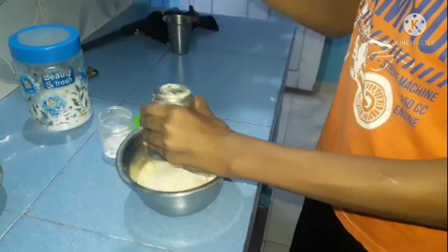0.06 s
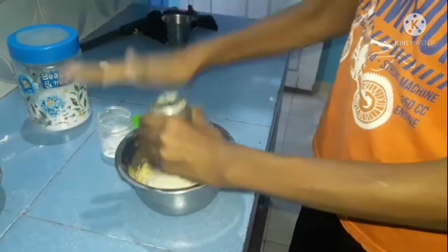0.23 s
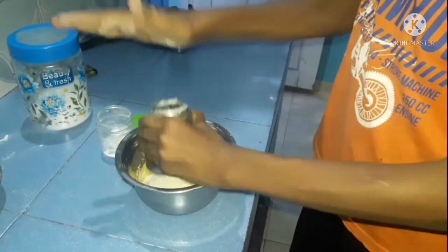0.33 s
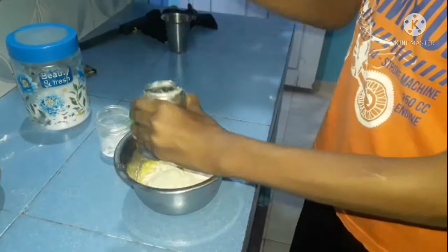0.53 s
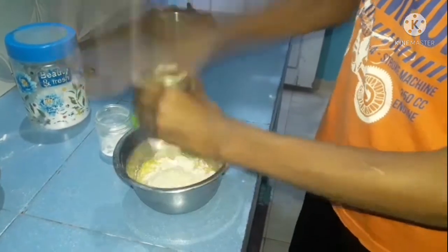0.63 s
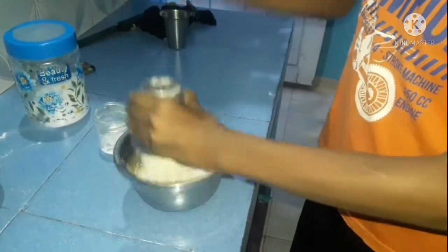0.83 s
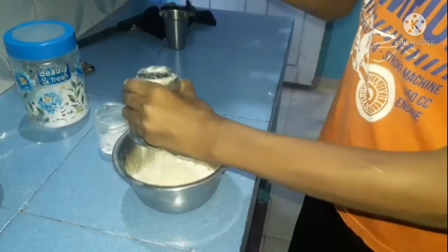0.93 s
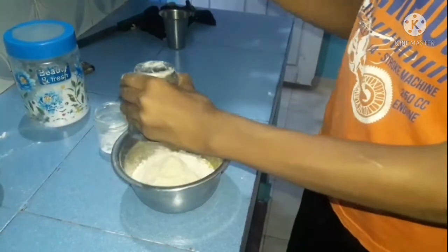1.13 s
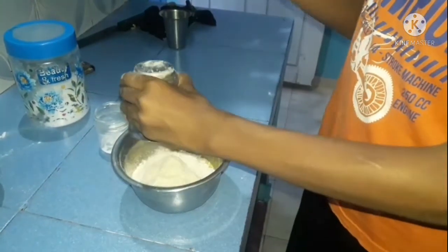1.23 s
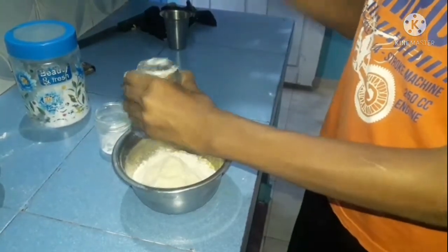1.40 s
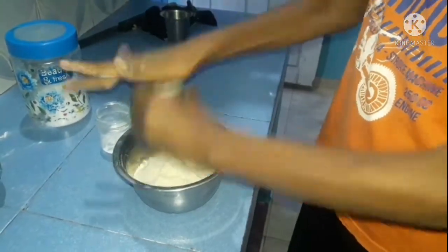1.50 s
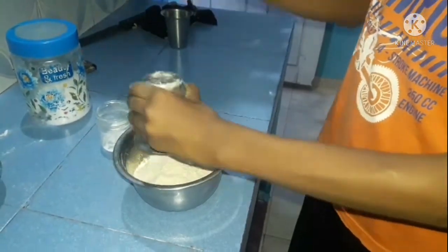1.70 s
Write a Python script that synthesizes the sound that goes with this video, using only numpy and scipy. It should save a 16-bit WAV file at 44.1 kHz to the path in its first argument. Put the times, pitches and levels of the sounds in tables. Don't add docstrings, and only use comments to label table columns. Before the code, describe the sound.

A hand slaps a steel tumbler over a metal bowl with a loud hollow crack, then a softer thud, bright clinks and a final knock, in an echoing tiled kitchen, heard by a phone a little way off.

```python
import sys
import numpy as np
from scipy import signal
from scipy.fft import rfft, irfft
from scipy.io import wavfile
from scipy.ndimage import uniform_filter1d

SR = 44100
rng = np.random.default_rng(int(sys.argv[2]) if len(sys.argv) > 2 else 0)


def level_to_linear(level):
    exponent = np.asarray(level, float) / 20
    return 10 ** exponent


def store_wav(level_fs):
    pcm = np.round(np.clip(np.atleast_2d(level_fs), -1, 1) * 32767)
    wavfile.write(sys.argv[1], SR, pcm.T.astype(np.int16))


N = 77175

# freq_hz, gain_db
RIM_CRACK = [(1000, -34.5), (2100, -0.5), (3200, -12.5), (4500, 1), (6000, -8.5), (9000, -12.5)]
# freq_hz, level_db, t60_s
RIM_MODES = [(1845, -9, 0.12), (2840, 3, 0.037), (3530, -12, .03), (4800, -2.5, .015), (5450, -13, 0.02)]


def set_rms(x, rms_db):
    return x * level_to_linear(rms_db) / np.sqrt(np.mean(x ** 2))


def read_table(table, freq_hz):
    table_hz, value = np.array(table).T
    return np.interp(np.log(np.maximum(freq_hz, 1)), np.log(table_hz), value)


def colour(x, spectrum, size=4096):
    half = size // 2
    gain_db = read_table(spectrum, np.arange(half + 1) * SR / size)
    cepstrum = irfft(gain_db * np.log(10) / 20)
    cepstrum[1:half] *= 2
    cepstrum[half + 1:] = 0
    impulse = irfft(np.exp(rfft(cepstrum)))
    return signal.fftconvolve(x, impulse)[:N], np.sqrt(np.sum(impulse ** 2))


def ring(x, modes):
    t = np.arange(SR // 2) / SR
    impulse = np.zeros(len(t))
    for freq_hz, level_db, t60_s in modes:
        decay = np.exp(-np.log(1000) * t / t60_s)
        impulse += level_to_linear(level_db) * np.sin(2 * np.pi * freq_hz * t) * decay
    return signal.fftconvolve(x, impulse)[:N]


def walk(rate_hz):
    hold = int(SR / rate_hz)
    steps = np.repeat(rng.standard_normal(N // hold + 1), hold)
    return uniform_filter1d(steps, hold)[:N]


def blows(events, crack_spectrum, modes):
    click_share, crack_db, ring_db = 0.25, 19.5, -13.5
    room_ring_db = -2.5
    size = 1024
    t = np.arange(size) / SR
    gritty, smooth = np.zeros(N + size), np.zeros(N + size)
    for start_s, level_db, contact_s in events:
        start = int(start_s * SR)
        burst = rng.standard_normal(size) * np.exp(-t / contact_s)
        burst /= np.sqrt(np.sum(burst ** 2))
        burst[0] += click_share
        gritty[start:start + size] += level_to_linear(level_db) * burst
        smooth[start] += level_to_linear(level_db)
    cracks = []
    for drive in (gritty, smooth):
        crack, norm = colour(drive[:N], crack_spectrum)
        cracks.append(level_to_linear(crack_db) * crack / norm)
    rings = level_to_linear(ring_db) * ring(smooth[:N], modes)
    return np.array(cracks) + rings * np.array([[1], [level_to_linear(room_ring_db)]])


def air():
    # freq_hz, gain_db
    hiss_spectrum = [(40, -25.5), (120, -11.5), (190, -25.5), (1200, -44.5), (3200, -34.5), (4000, -23.5),
                     (6200, -41.5), (14000, -34)]
    hiss_db, hum_hz, hum_db = -65, 116.5, -68
    hiss = set_rms(colour(rng.standard_normal(N), hiss_spectrum)[0], hiss_db) * level_to_linear(1.1 * walk(24))
    pitch_hz = hum_hz * (1 + 0.029 * walk(3.3))
    hum = np.sin(2 * np.pi * np.cumsum(pitch_hz) / SR)
    return hiss + hum * level_to_linear(hum_db + 5.2 * walk(12))


def slide():
    # time_s, scrape_db, singing_db
    motion = [(0, -50, -46.5), (0.052, -48.5, -55.5), (0.101, -45.5, -55.5), (.14, -49.5, -57),
              (0.172, -51, -74), (0.202, -57.5, -59), (.3, -80, -72.5), (.62, -84, -82), (.84, -52, -55),
              (.95, -46.5, -78), (1.05, -60.5, -76), (1.079, -63.5, -59.5), (1.13, -75.5, -57),
              (1.21, -74, -63.5), (1.3, -76.5, -67.5), (1.329, -79.5, -75.5), (1.48, -72.5, -75),
              (1.75, -102, -80)]
    # freq_hz, gain_db
    scrape_spectrum = [(40, -57.5), (109, -5), (160, -19), (700, -20.5), (1280, -28.5), (2780, -24),
                       (4500, -35.5), (6000, -43)]
    # freq_hz, level_db, t60_s
    bowl_modes = [(2742, 19, .14), (2680, 8, 0.14), (2720, -5.5, 0.025), (2082, -10.5, .05),
                  (2520, -31, 0.014)]
    t = np.arange(N) / SR
    time_s, scrape_db, singing_db = np.array(motion).T
    grit = rng.standard_normal(N) * level_to_linear(2.7 * walk(130))
    scrape = set_rms(colour(grit, scrape_spectrum)[0], 0)
    singing = ring(rng.standard_normal(N), bowl_modes)
    singing /= np.sqrt(uniform_filter1d(singing ** 2, size=3000))
    return scrape * level_to_linear(np.interp(t, time_s, scrape_db)) + singing * level_to_linear(np.interp(t, time_s, singing_db))


def rim_ticks():
    # start_s, level_db, contact_s
    events = [(.0075, -41.5, .0006), (.015, -62, 0.0045), (.023, -45, 0.0021), (.0455, -48.5, 0.0045),
              (.0745, -48, .0015), (1.037, -51.5, 0.0023), (1.1344, -54, 0.0016), (1.2517, -60, .001),
              (1.4866, -64, .001)]
    return blows(events, RIM_CRACK, RIM_MODES)


def foot_bumps():
    # start_s, level_db, contact_s
    events = [(.003, -65, .002), (.838, -33, 0.0046), (0.99, -49.5, 0.0034), (.930, -37.5, .002),
              (1.1, -58.5, 0.0018), (1.297, -67, 0.0044)]
    # freq_hz, gain_db
    crack_spectrum = [(60, -20), (130, 0), (300, -7.5), (500, -7.5), (900, -48.5)]
    # freq_hz, level_db, t60_s
    modes = [(163, -11, 0.11), (306, -3.5, 0.064)]
    return blows(events, crack_spectrum, modes)


def bounces():
    # start_s, level_db, contact_s
    events = [
        (.0455, -56, .001),
        (.8570, -45, .001),
        (.8732, -48, .001),
        (.8880, -50, .001),
    ]
    # freq_hz, level_db, t60_s
    modes = [(2760, 24, .016)]
    return blows(events, RIM_CRACK, modes)


def knocks():
    # start_s, level_db, contact_s
    events = [
        (1.5072, -48, 0.00069),
        (1.5086, -43, 0.0016),
        (1.5107, -27.5, 0.0029),
    ]
    # freq_hz, gain_db
    crack_spectrum = [(200, -38), (700, -9), (1000, -3.5), (1400, -21), (2900, -6.5), (3700, -5),
                      (5400, -9), (12000, -9)]
    # freq_hz, level_db, t60_s
    modes = [(824, -14, .15), (924, -10, .08), (1113, -8, .08), (1976, -14, .05), (2330, -14, .05),
             (3391, -8, .06), (3585, -14, .06), (4800, -12, .03), (5346, -6, .08), (2870, 21, .010)]
    return blows(events, crack_spectrum, modes)


def clinks():
    # start_s, level_db, contact_s
    events = [
        (.8352, -47.5, .001),
        (.8378, -24, .0005),
        (.9152, -34.5, .0004),
        (.9225, -47, 0.0015),
    ]
    # freq_hz, gain_db
    crack_spectrum = [(120, -38.5), (320, 2), (690, -14), (1570, -6.5), (2400, -18.5), (2860, -5),
                      (4800, -3), (6000, -5)]
    return blows(events, crack_spectrum, RIM_MODES)


def thuds():
    # start_s, level_db, contact_s
    events = [
        (.6777, -34.5, 0.0027),
        (.6797, -16.5, 0.00132),
    ]
    # freq_hz, gain_db
    crack_spectrum = [(40, -36.5), (110, -14.5), (210, -2), (500, -19.5), (2100, -48.5), (3100, -15.5),
                      (5500, -17), (9000, -18.5)]
    # freq_hz, level_db, t60_s
    modes = [(145, -3, .17), (215, -3, .1), (290, -10, .06), (3300, -6, .015), (4850, -8, .015),
             (3000, 16, .007)]
    return blows(events, crack_spectrum, modes)


def slaps():
    # start_s, level_db, contact_s
    events = [
        (.0905, -42, .004),
        (.099, -40, 0.01),
        (.2050, -29.5, .001),
        (.2060, -16.5, 0.0014),
        (.2073, -8, 0.0025),
    ]
    # freq_hz, gain_db
    crack_spectrum = [(60, -44), (110, -23), (300, 0.5), (900, -13.5), (1200, -22), (2800, -22.5),
                      (3400, -20.5), (4500, -11.5)]
    # freq_hz, level_db, t60_s
    modes = [(223.4, -12.5, 0.17), (307, -0.5, 0.087), (416, -7.5, .04), (836, -9, 0.048),
             (2912, -5.5, 0.028), (4430, -4, .015), (4530, 2, .015), (5290, -2.5, 0.035),
             (6360, -3.5, 0.0079)]
    return blows(events, crack_spectrum, modes)


def kitchen(hits):
    # freq_hz, t60_s
    decay_times = [(60, 0.56), (150, 0.59), (400, .5), (1000, .42), (2500, 0.35), (5000, 0.43),
                   (9000, 0.27), (15000, 0.24)]
    # delay_s, level_db
    echoes = [(.0052, -10), (.0060, -5), (.0115, -15), (.019, -14)]
    # freq_hz, gain_db
    direct_spectrum = [(5500, 1), (8000, -2.5), (14000, -4)]
    tail_db, rise_s = 0.5, 0.0026
    t = np.arange(SR) / SR
    tail = np.zeros(SR)
    for band_hz in 45 * 2 ** np.arange(0, 8.6, 0.5):
        band = signal.butter(2, [band_hz / 1.19, band_hz * 1.19], "bandpass", fs=SR, output="sos")
        t60_s = max(read_table(decay_times, band_hz), 0.05)
        tail += signal.sosfilt(band, rng.standard_normal(SR)) * np.exp(-np.log(1000) * t / t60_s)
    tail *= 1 - np.exp(-t / rise_s)
    tail *= level_to_linear(tail_db) / np.sqrt(np.sum(tail ** 2))
    near = hits[0].copy()
    for delay_s, level_db in echoes:
        delay = int(delay_s * SR)
        near[delay:] += level_to_linear(level_db) * hits[0, :N - delay]
    return colour(near, direct_spectrum)[0] + signal.fftconvolve(hits[1], tail)[:N]


def scene():
    hits = rim_ticks() + foot_bumps() + bounces() + knocks() + clinks() + thuds() + slaps()
    return (air() + slide() + kitchen(hits))[None]


def roll_off(x):
    return signal.sosfilt(signal.butter(12, 17160, fs=SR, output="sos"), x)


def record(dry):
    # freq_hz, gain_db
    mic_spectrum = [(5800, 3.5), (6800, -6), (7600, -11.5), (8500, -10.5), (10800, -3), (12500, -10.5),
                    (15400, -10), (16000, -36.5)]
    low_cut = signal.butter(3, 70, "highpass", fs=SR, output="sos")
    heard = colour(signal.sosfilt(low_cut, dry[0]), mic_spectrum)[0]
    return roll_off(heard[None])


dry = scene()
out = record(dry)
store_wav(out)
```